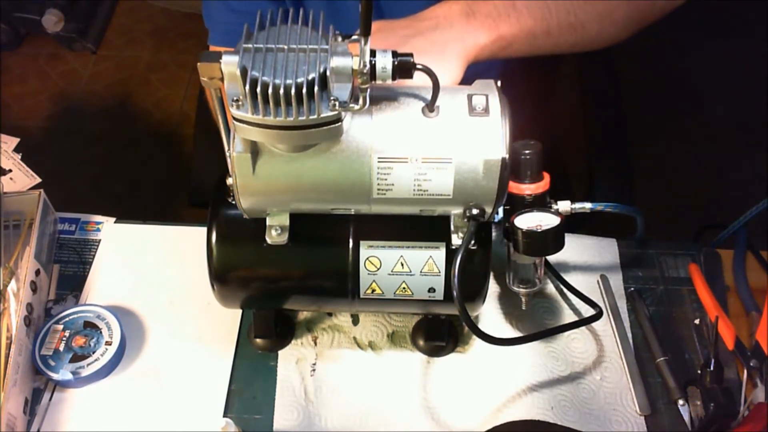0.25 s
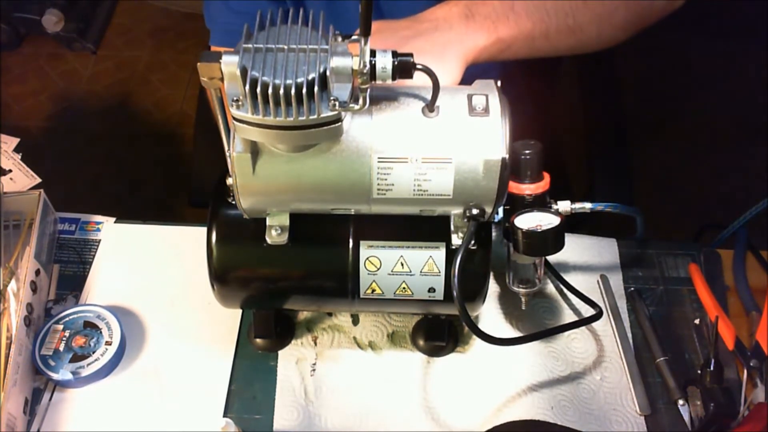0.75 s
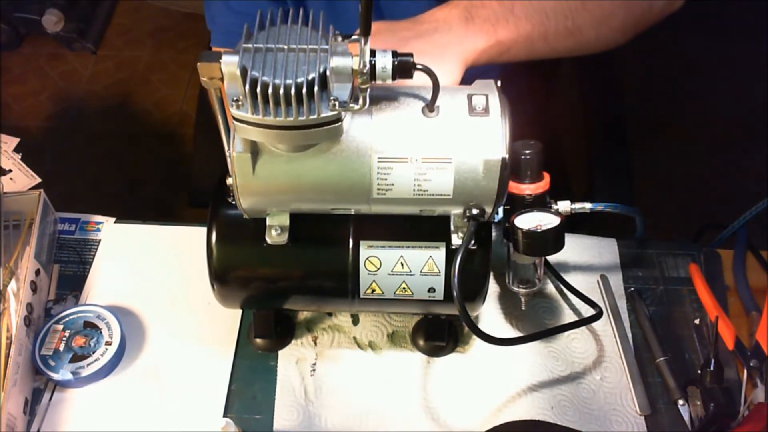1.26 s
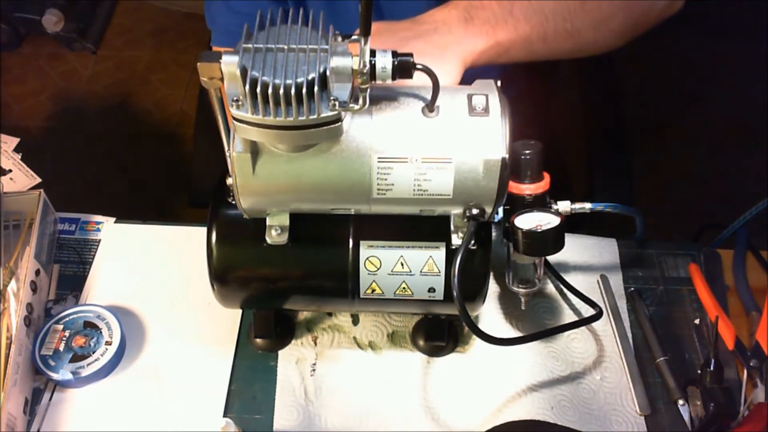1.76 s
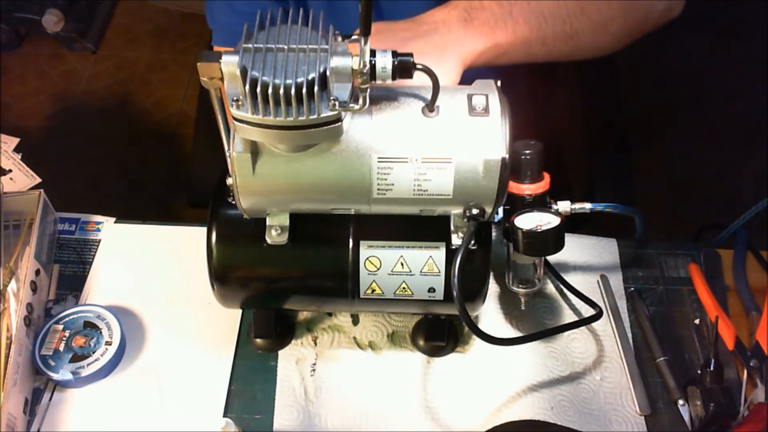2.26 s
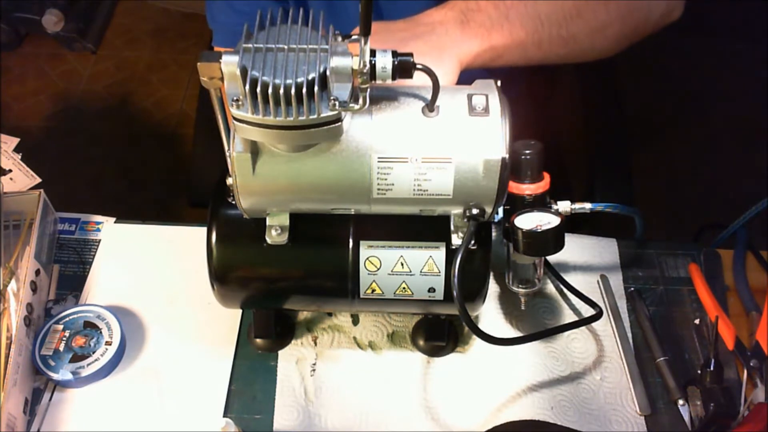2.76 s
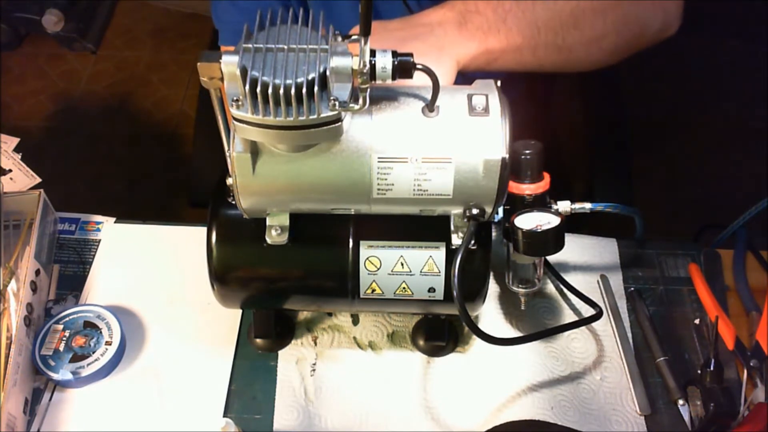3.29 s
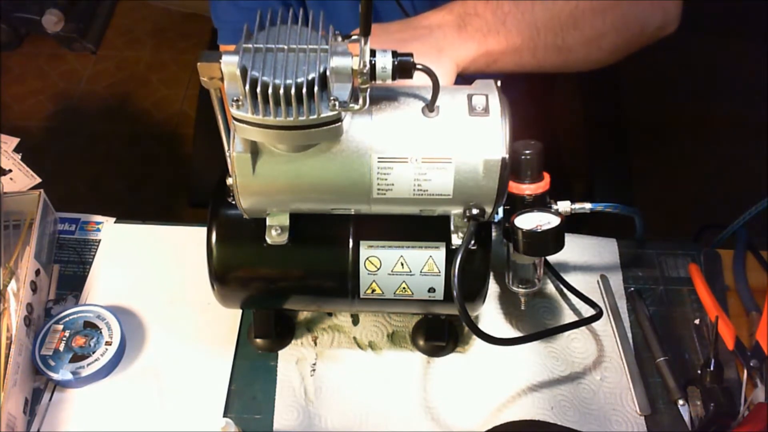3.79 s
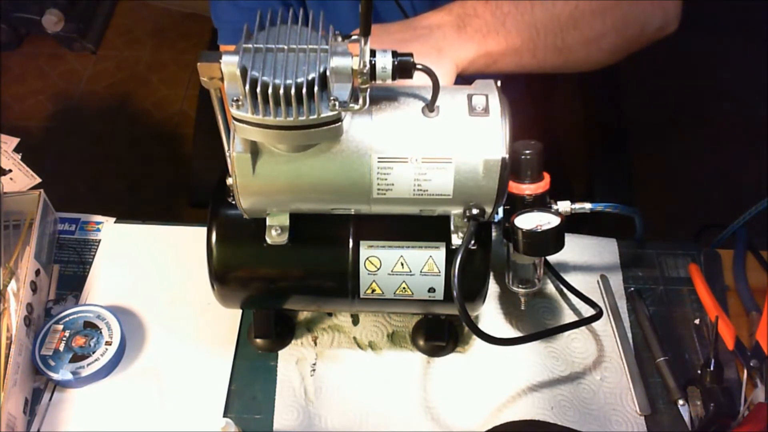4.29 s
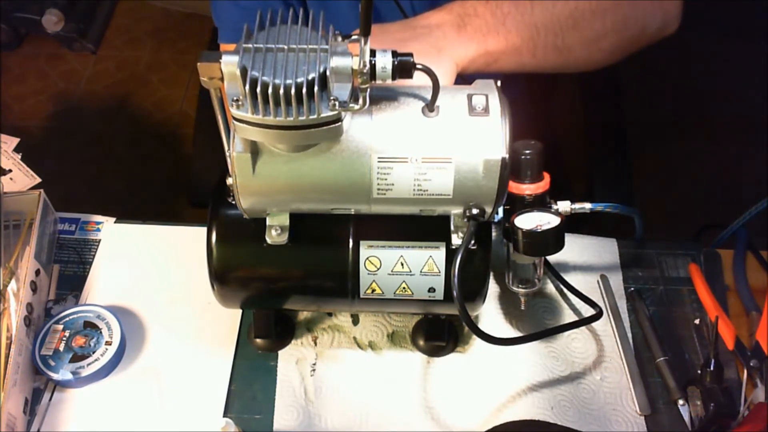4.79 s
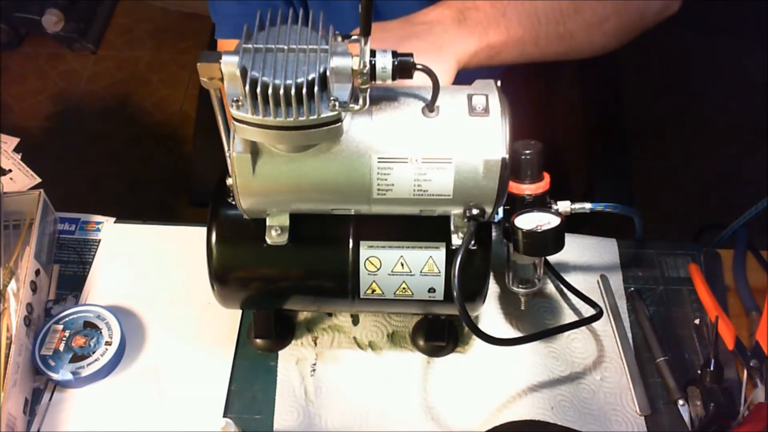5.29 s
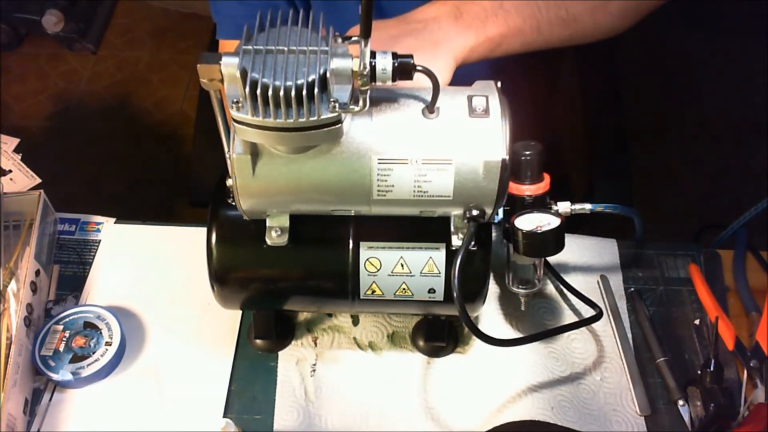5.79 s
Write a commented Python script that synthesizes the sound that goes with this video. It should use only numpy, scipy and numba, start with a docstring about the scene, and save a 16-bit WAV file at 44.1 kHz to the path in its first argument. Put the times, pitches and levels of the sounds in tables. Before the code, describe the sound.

In a small room, heard through a single microphone, a small air compressor vents its tank in a loud, bright, ringing hiss that gradually fades out. A thin leak lingers and sinks in pitch while the whirr of the motor and fan rises and holds steady. Near the end, over the running motor, the metal valve clacks several times, ticks lightly and lets out two brief spurts of air.

```python
"""A loud hiss of air from the tank valve of a small workbench compressor, dying away as the pressure drops.
The jet rings and whistles in the valve and blows across the hollow round it. Then the whirr of the motor
and its fan swells up under a last thin leak. The valve is worked again: two short spurts, three clacks
and a few light ticks. One microphone in a small room, the same signal in both channels."""
import sys
import numpy as np
from scipy import signal
from scipy.fft import rfft, irfft
from scipy.io import wavfile
from scipy.ndimage import uniform_filter1d
from numba import njit

SR = 44100
rng = np.random.default_rng(int(sys.argv[2]) if len(sys.argv) > 2 else 0)


def waveform_to_disk(signal):
    """Save audio, clipped to [-1, 1], as 16-bit WAV at the path in sys.argv[1]."""
    frames = np.transpose(np.atleast_2d(signal))
    scaled = np.clip(frames, -1, 1) * 32767
    samples = np.round(scaled).astype(np.int16)
    wavfile.write(sys.argv[1], SR, samples)


N = 266628
T = np.arange(N) / SR
FREQS = np.arange(N // 2 + 1) * SR / N

# spectrum of a narrow jet: f/Hz, level/dB
JET_SPECTRUM = [(3000, -48), (6000, -16), (7200, -8), (8000, -5.5), (8600, -12), (9050, -5.5), (9250, -15),
                (9800, -10.5), (10300, -17.5), (11600, -18), (12300, -20), (13700, -13), (15800, -18)]
# resonances of the slit in the nearly shut valve: f/Hz, width/Hz, level/dB
SLIT_MODES = [(3850, 270, -12), (4380, 34, -15), (5280, 380, -14), (5560, 55, -13), (5970, 120, -11),
              (6320, 41, -11), (6710, 38, -12), (7170, 100, -8), (7820, 49, -6), (8170, 37, 0),
              (8470, 70, -2), (8720, 52, -10), (8970, 52, -5), (9370, 36, -15), (9600, 59, -13),
              (10300, 40, -16)]


def vent():
    """The open valve: a fluttering jet rings the valve; its roar dies first as the pressure drops."""
    # spectra of the hiss and of the coarse roar: f/Hz, level/dB
    hiss_spectrum = [(1500, -48), (3350, -27), (3600, -11.5), (3980, -4.5), (4200, -9), (5000, -1.5),
                     (6100, 1), (6600, -1.5), (8300, 1), (9500, -2.5), (11500, -4), (12100, -10),
                     (13800, -8.5), (15800, -16)]
    roar_spectrum = [(40, -35), (250, -20), (400, -9.5), (1000, -4.5), (1600, -2), (2000, 2), (2550, 0.5),
                     (2950, 3), (3300, -11.5), (3650, 4.5), (4500, -6.5), (8000, -11.5), (16000, -12)]
    # ringing and whistling resonances of the open valve: f/Hz, width/Hz, level/dB
    valve_modes = [(1980, 110, -9), (2350, 150, -10), (2970, 120, -8), (3620, 410, -7), (4380, 72, -11),
                   (4950, 85, -8), (5290, 150, -8), (5540, 85, -7), (6030, 130, -6), (6680, 41, -7),
                   (7110, 110, -3), (7360, 50, -3), (7590, 87, 0), (8210, 51, -6), (11200, 100, -9),
                   (11600, 150, -11), (13400, 68, -15), (13700, 100, -14), (13900, 62, -15),
                   (14300, 180, -17)]
    whistle_modes = [(7120, 120, -3), (7360, 70, -3), (7590, 87, 0), (8020, 73, -5)]
    sag_db = 4.5 * T  # the tank pressure sags steadily
    closing_db = 3 * since(1.23) ** 2 + 10 * since(3.03)  # throttled ever faster, then pinched off
    flutter = undb(0.18 * walk(35.6))
    hiss = undb(-2) * coloured(hiss_spectrum) + undb(-8.5) * resonant(valve_modes)
    roar = undb(-40 - 2.25 * sag_db - 0.42 * closing_db) * coloured(roar_spectrum)
    lock_s = 1.24  # the stream locks on to the whistle best here, and the whole vent lifts a little
    lock = undb(-5 - 6 * (T - lock_s) ** 2)
    lift = undb(0.99 * hump(lock_s, 0.4))
    whistle = lock * undb(walk(19.4)) * resonant(whistle_modes)
    return flutter * lift * (undb(-36 - sag_db - closing_db) * (hiss + whistle) + roar)


def rush():
    """The stream blows across the hollow round the valve, surging at times and rumbling at first."""
    # resonances of the hollow: f/Hz, width/Hz, level/dB
    hollow_modes = [(378, 79, -18.5), (670, 50, 4.5), (904, 136, 2.5), (990, 71, -2), (1103, 43, -3.5),
                    (1291, 49, -11.5), (1476, 28, -8)]
    # surges of the stream: t/s, half length/s, lift/dB
    surges = [(1.944, 0.12, 5.5), (2.5, .06, 1.5), (2.72, .06, 5.5)]
    surge_db = sum(lift_db * hump(at, half) for at, half, lift_db in surges)
    blowing = fading(-43.5, until=0.97, db_per_s=12.5)
    hollow = blowing * undb(surge_db + 0.72 * walk(24.75)) * resonant(hollow_modes)
    rumble = coloured([(25, -1), (70, 1.5), (150, -6), (350, 6.5), (600, 4), (1500, -40)])
    return hollow + undb(-57.5 - 20 * T) * rumble


def leak():
    """The nearly shut valve sings thinly, sinking in pitch as it fades; a fine sizzle dies first."""
    # spectrum of the leak's lower hiss: f/Hz, level/dB
    lower_spectrum = [(1200, -29), (2500, -6), (3350, -10.5), (3650, 0.5), (3980, 2.5), (4200, -11),
                      (4800, -2), (5150, 1.5), (5700, -4), (6000, 0.5), (6600, -5), (7500, -16),
                      (10000, -29)]
    # the slit opens, then narrows: t/s, open share
    opening = [(2.9, 0.18), (3.55, 1), (4.96, 1), (5.03, 0.21)]
    edge_hz = 9530 * 2 ** (-1.22 * since(3.69))
    jet_hz = np.maximum(edge_hz, 8000)  # the edge note keeps falling; the jet stays on the slit's resonance
    stream = coloured(JET_SPECTRUM) + undb(-2.5) * resonant(SLIT_MODES)  # a weak stream rings it less
    jet = fading(-32, until=3.746, db_per_s=18) * unit(bandpass(stream, jet_hz, 3700.0))
    lower = fading(-40.5, until=3.97, db_per_s=14.5) * coloured(lower_spectrum)
    edge_band = bandpass(rng.standard_normal(N), edge_hz, 1700.0)
    edge = fading(-41.5, until=4, db_per_s=30) * unit(bandpass(edge_band, edge_hz, 1700.0))
    sizzle = fading(-48, until=3.82, db_per_s=34) * resonant([(11600, 650, 0), (13700, 260, -1)])
    open_share = np.interp(T, *np.transpose(opening))
    return swell() * open_share * undb(0.44 * walk(30.2)) * (jet + lower + edge + sizzle)


def spurts():
    """Short blasts with a broad spray; the jet's peak sinks as the pressure behind the valve falls."""
    # blasts: t/s, rise/s, hold/s, fade/(dB/s), level/dB, first peak/Hz, last peak/Hz, spray/dB re jet
    blasts = [(5.304, 0.039, 0.066, 164, -27.5, 9020, 7500, -1.5),
              (5.682, 0.035, 0.025, 204, -33.5, 7860, 7400, -2)]
    # spectrum of the spray: f/Hz, level/dB
    spray_spectrum = [(800, -16), (2000, -5), (2700, 1.5), (3300, -1.5), (3850, 7.5), (4250, 0.5),
                      (5200, 5), (6800, 4.5), (7600, 5), (9000, 3), (10300, -0.5), (12200, -10.5),
                      (13800, -8), (15800, -14)]
    spray = coloured(spray_spectrum)
    stream = resonant(SLIT_MODES) + undb(-3) * coloured(JET_SPECTRUM)
    out = 0
    for start, rise, hold, db_per_s, db, first_hz, last_hz, spray_db in blasts:
        peak_hz = np.interp(T, [start, start + 0.13], [first_hz, last_hz])
        jet = unit(bandpass(stream, peak_hz, 1400.0))
        out += undb(db) * burst(start, rise, hold, db_per_s) * (jet + undb(spray_db) * spray)
    return out * undb(0.63 * walk(160))


def clacks():
    """The valve stem scrapes and seats: a gritty crack, a ring of its body and a thud in the tank."""
    # contacts of the stem: t/s, level/dB, scrape/s, t60/s, thud/dB re crack, ring/dB re crack
    contacts = [(4.9774, -40, 0.0044, 0.033, 0, 1), (4.984, -30, 0.0034, 0.067, -6, -4.5),
                (5.337, -33.5, 0.0037, 0.051, 3, -14), (5.527, -38, 0.011, 0.036, 7, -5),
                (5.5396, -48, .004, 0.071, 15, -17), (5.86, -36, 0.0031, 0.034, 9.5, -16),
                (5.8661, -38, 0.0093, 0.042, 6.5, -17), (5.878, -34.5, 0.004, 0.062, 0, -22)]
    # spectrum of the crack: f/Hz, level/dB
    crack_spectrum = [(300, 4.5), (1400, 7.5), (2100, 2), (3200, 4.5), (4500, 3), (6400, -1), (8000, 1.5),
                      (9300, -2.5), (10500, -17), (11500, -26), (16000, -35)]
    # resonances of the valve body and of the tank: f/Hz, width/Hz, level/dB
    body_modes = [(2720, 200, -2), (4020, 260, -1), (4750, 160, -3), (5790, 200, 3), (6620, 160, -4),
                  (7850, 260, -3), (8580, 200, -3), (10550, 200, -16)]
    tank_modes = [(599.5, 290, -8), (1000, 170, 5), (1540, 155, -2.5)]
    crack = coloured(crack_spectrum) * undb(0.77 * walk(700))
    ring, thud = resonant(body_modes), resonant(tank_modes)
    out = 0
    for start, db, scrape, t60, thud_db, ring_db in contacts:
        sound = crack + undb(thud_db) * thud + undb(ring_db) * ring
        out += undb(db) * burst(start, 0.00057, scrape, 60 / t60) * sound
    return out


def ticks():
    """Tiny bright ticks from the valve's metal parts."""
    # light contacts: t/s, level/dB, f/Hz
    contacts = [(5.094, -45, 6600), (5.156, -43, 7900), (5.5735, -44, 7900), (5.938, -45, 7260),
                (6.0405, -44.5, 7300)]
    return sum(undb(db) * burst(start, 0.0007, 0.0015, 2600) * resonant([(hz, 1500, 0)])
               for start, db, hz in contacts)


def motor():
    """Fan air whirrs round the housing, with gently wavering shaft, mains and blade tones on top."""
    # spectrum of the fan air: f/Hz, level/dB
    whirr_spectrum = [(25, -9), (54, 0), (90, -8), (180, -3), (290, -6), (400, -0.5), (700, -0.5),
                      (930, 1.5), (1250, -2), (1700, -12.5), (2400, -19.5), (4300, -25.5), (10500, -31),
                      (15500, -28.5)]
    # shaft, mains and blade tones: f/Hz, level/dB
    partials = [(58.8, -20), (120, -22), (166.5, -22.5), (387.6, -18.5), (438.2, -18.5), (657.3, -22),
                (790, -20.5), (876.4, -7.5), (921.5, -17), (1095.4, -8), (1501.5, -23.5), (1647, -26)]
    whirr = coloured(whirr_spectrum) * undb(0.52 * walk(60))
    turning_s = T + np.cumsum(0.0006 * walk(6)) / SR  # slight changes of speed shift all tones together
    tones = 0
    for hz, db in partials:
        cycles = hz * turning_s + rng.random() + 0.035 * walk(14)
        tones += undb(db + 1.8 * walk(7)) * np.sin(2 * np.pi * cycles)
    return undb(-35) * swell() * (whirr + undb(0.2) * tones)


def room(x, t60=0.25, wet_db=-12):
    """Dense short reflections from the bench and the walls follow the direct sound to the microphone."""
    age = T[:SR // 2]
    tail = rng.standard_normal(len(age)) * undb(-60 * age / t60) * (age > 0.003)
    return x + undb(wet_db) * signal.fftconvolve(x, tail / np.linalg.norm(tail))[:N]


def swell(start=3.442, tau_s=0.51, faint_db=-31):
    """Gain shared by whirr and leak: faint at first, then rising quickly and easing towards 1."""
    risen = (1 - np.exp(-since(start) / tau_s)) ** 1.86
    return undb(faint_db) + (1 - undb(faint_db)) * risen


def burst(start, rise, hold, db_per_s):
    """Envelope that opens, holds, then fades."""
    return np.clip((T - start) / rise, 0, 1) ** 2 * fading(0, start + rise + hold, db_per_s)


def fading(db, until, db_per_s):
    """Gain that holds a level until a time in seconds, then fades."""
    return undb(db - db_per_s * since(until))


def hump(at, half):
    """Smooth rise and fall round a moment, 1 at its top."""
    return np.exp(-((T - at) / half) ** 2)


def since(start):
    """Seconds since a moment, 0 before it."""
    return np.maximum(T - start, 0)


def walk(rate):
    """Random levels held 1 / rate s and smoothed twice, rms 1."""
    span = max(int(SR / rate), 1)
    held = np.repeat(rng.standard_normal(N // span + 1), span)[:N]
    return unit(uniform_filter1d(uniform_filter1d(held, span), span))


def coloured(points):
    """Turbulence with a spectrum of (f/Hz, level/dB) points."""
    hz, db = np.transpose(sorted(points))
    return turbulence(undb(np.interp(np.log(FREQS + 1), np.log(hz), db)))


def resonant(modes):
    """Turbulence ringing in steep-sided resonances (f/Hz, width/Hz, level/dB)."""
    power = sum((undb(db) / (1 + 2 * ((FREQS - hz) / width) ** 2)) ** 2 for hz, width, db in modes)
    return turbulence(np.sqrt(power))


def turbulence(gain):
    """Random pressure through a frequency response, rms 1."""
    return unit(irfft(rfft(rng.standard_normal(N)) * gain, N))


@njit
def bandpass(x, hz, width_hz):
    """State-variable band-pass whose centre moves every sample."""
    out = np.empty(len(x))
    band_state, low_state = 0., 0.
    for i in range(len(x)):
        g, damping = np.tan(np.pi * hz[i] / SR), width_hz / hz[i]
        band = (band_state + g * (x[i] - low_state)) / (1 + g * (g + damping))
        band_state = 2 * band - band_state
        low_state += 2 * g * band
        out[i] = damping * band
    return out


def undb(db):
    """Decibels to gain."""
    return 10 ** (np.asarray(db) / 20)


def unit(x):
    """Scale to rms 1."""
    return x / np.sqrt(np.mean(x ** 2))


def scene():
    """One microphone hears the valve with the room's reflections and the motor direct."""
    mono = room(vent() + rush() + leak() + spurts() + clacks() + ticks()) + motor()
    return np.array([mono, mono])


def record(dry, top_hz=15720):
    """The recorder cuts the top steeply; an inaudible offset of its input rises along with the whirr."""
    lowpass = signal.ellip(12, 0.1, 80, top_hz, fs=SR, output="sos")
    offset = undb(-28) * swell()
    return signal.sosfilt(lowpass, dry) - offset


dry = scene()
out = record(dry)
waveform_to_disk(out)
```